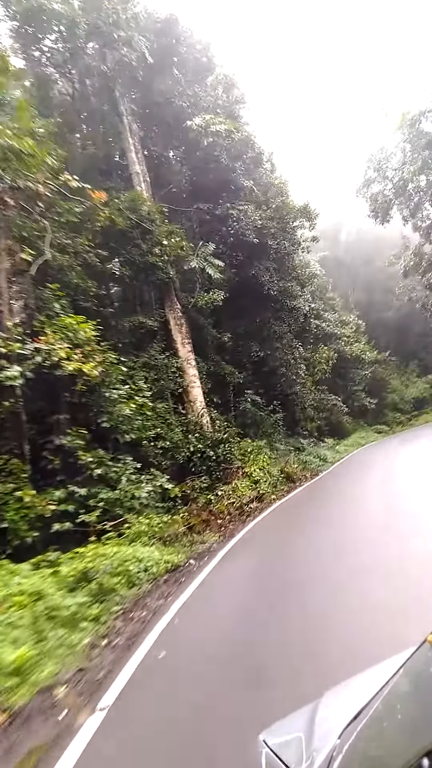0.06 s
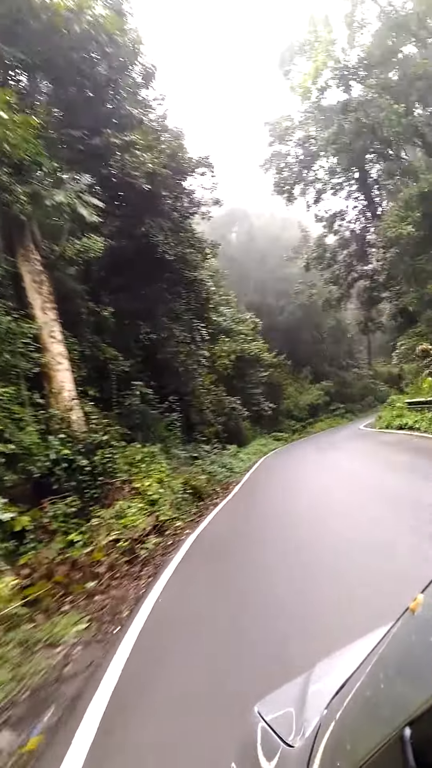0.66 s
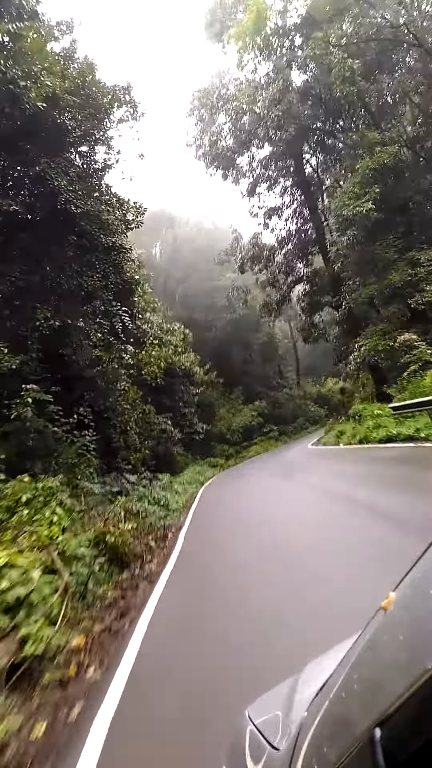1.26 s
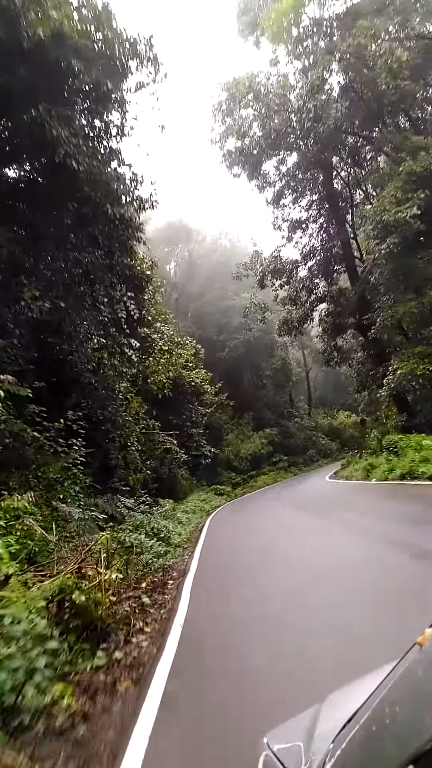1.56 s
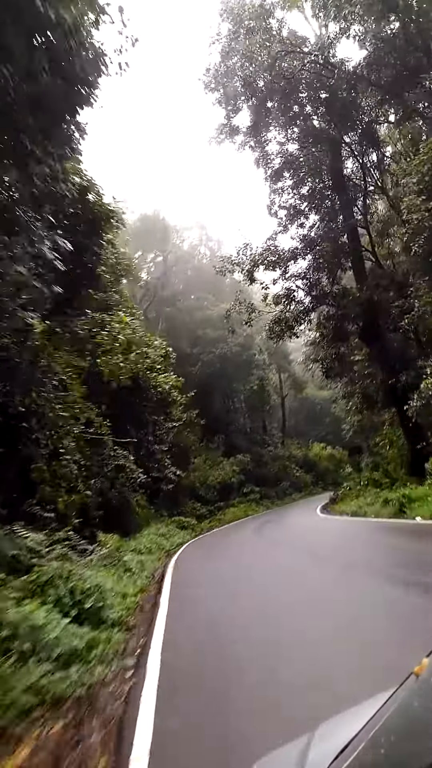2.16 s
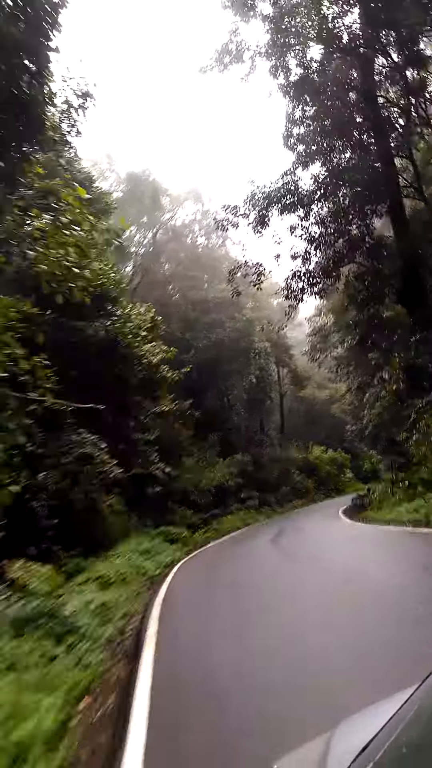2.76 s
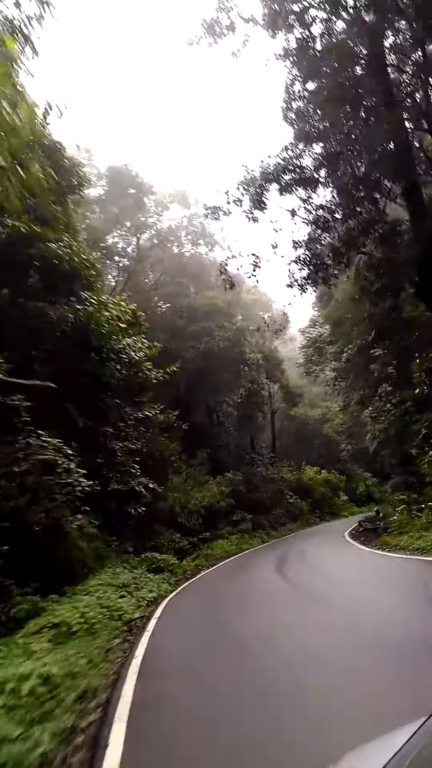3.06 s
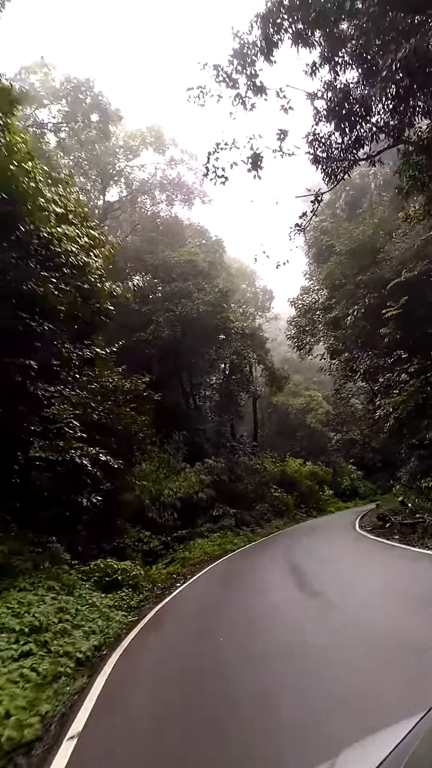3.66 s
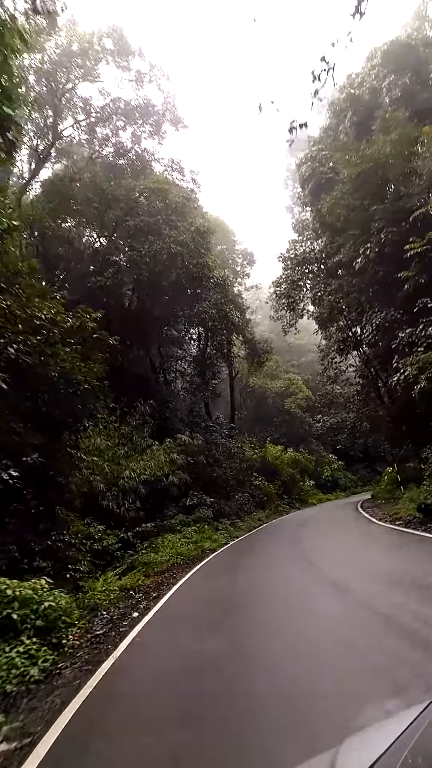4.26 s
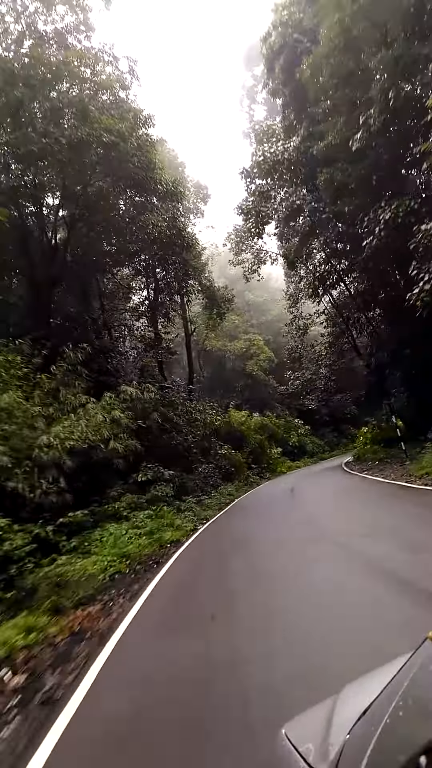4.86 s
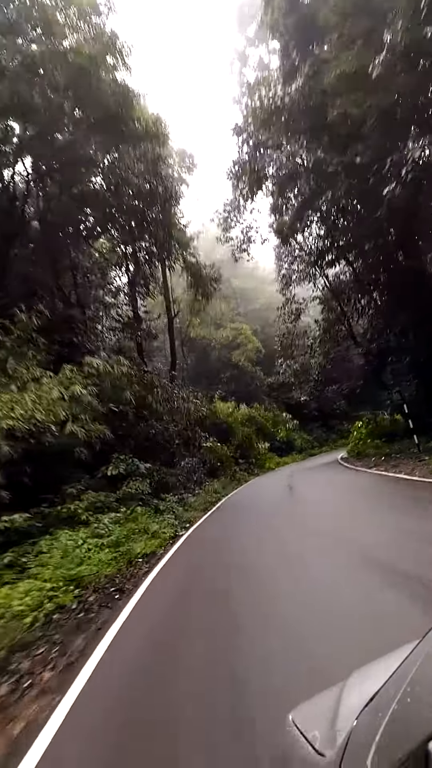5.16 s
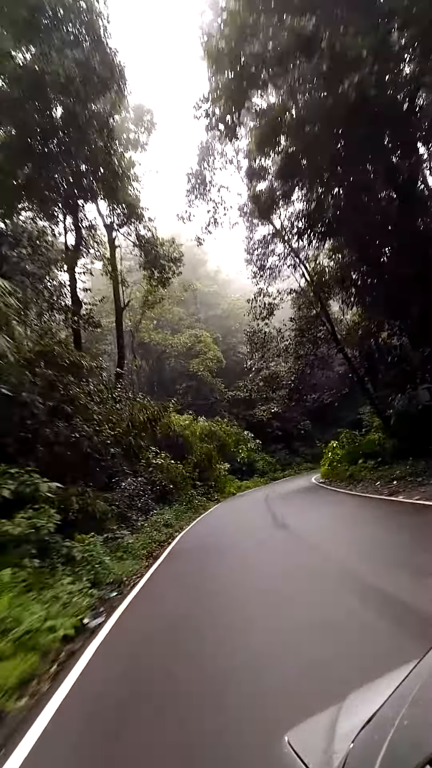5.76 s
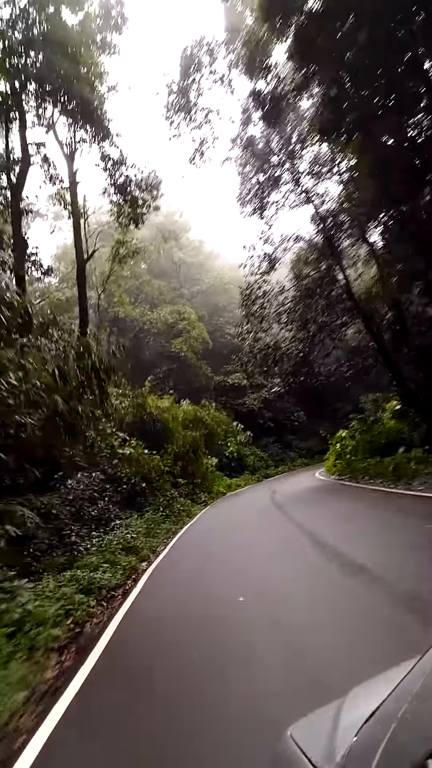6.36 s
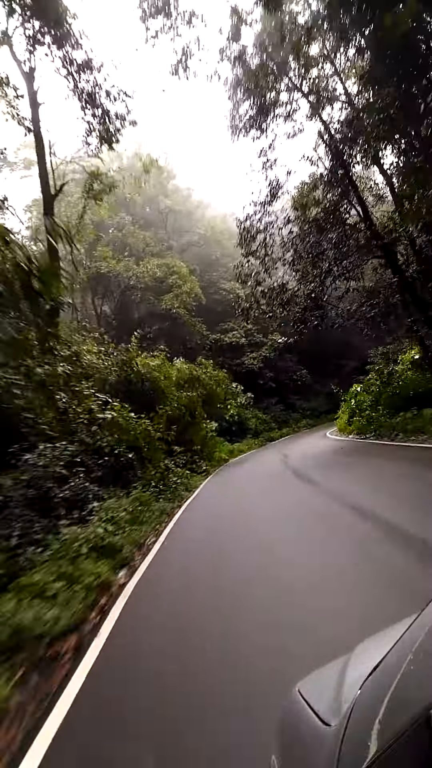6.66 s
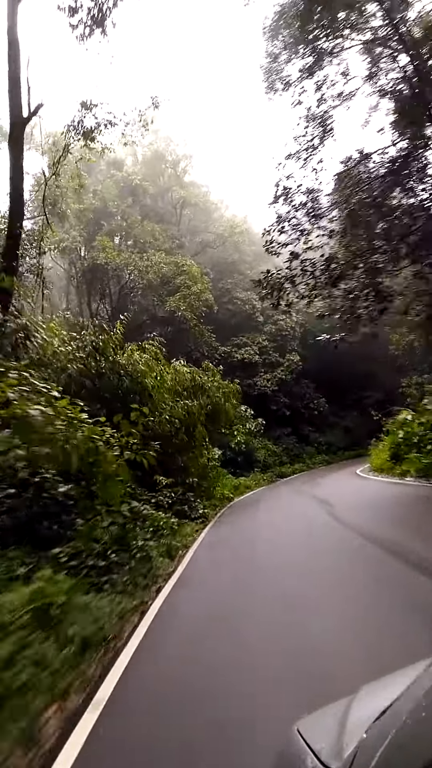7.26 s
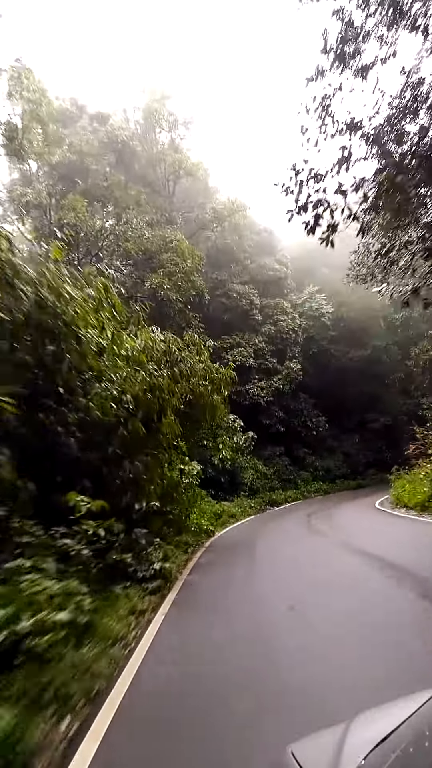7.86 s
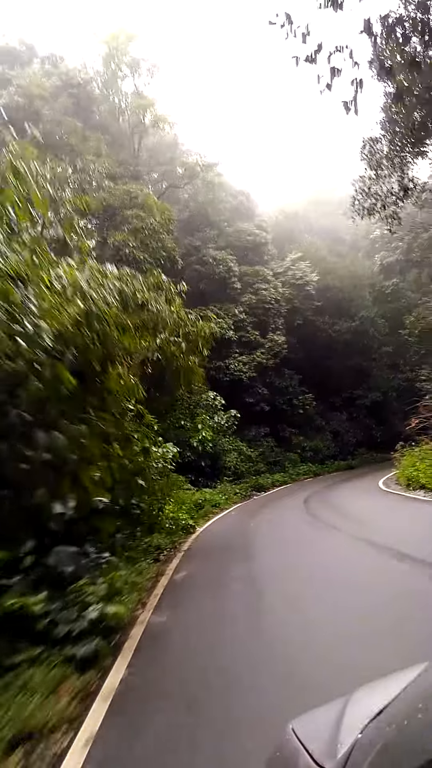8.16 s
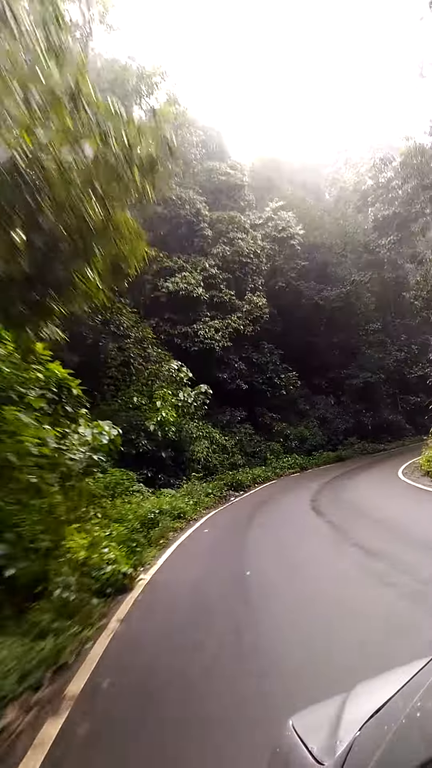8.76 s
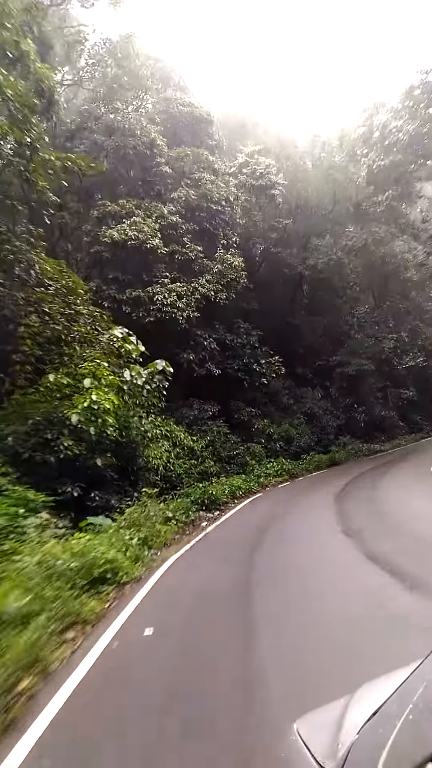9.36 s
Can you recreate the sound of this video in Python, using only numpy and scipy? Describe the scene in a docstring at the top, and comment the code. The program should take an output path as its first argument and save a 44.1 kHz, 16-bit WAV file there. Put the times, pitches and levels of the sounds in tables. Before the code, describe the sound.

Gusting wind buffets and slaps a microphone at an open car window, over a low engine hum and tyres on a damp road.

```python
"""At the open window of a car on a damp forest road, a phone is held in the rushing air.
Swirls of air (eddies) buffet its microphone, tear into a rough flutter on their crests and
now and then land as hard slaps; the biggest swings overload the input. Underneath, the engine
hums higher as the car gathers speed, then eases off. The tyres roar and hiss on the road,
and thin high tones swell briefly."""
import sys
import numpy as np
from scipy import signal
from scipy.fft import rfft, irfft, next_fast_len
from scipy.io import wavfile
from scipy.ndimage import uniform_filter1d, map_coordinates

SR = 44100
rng = np.random.default_rng(int(sys.argv[2]) if len(sys.argv) > 2 else 0)


def output_pcm(signal):
    """Save a mono or channel-first signal as 16-bit PCM at the path in sys.argv[1].

    Samples are clipped to [-1, 1] before scaling.
    """
    pcm = np.clip(np.atleast_2d(signal).T, -1, 1) * 32767
    wavfile.write(sys.argv[1], SR, np.round(pcm).astype(np.int16))


N = 414540
TIME = np.arange(N) / SR


def from_db(db):
    """Turn decibels into a number to multiply by."""
    return 10 ** (np.asarray(db) / 20)


def in_time(rows):
    """Join a table's points with straight lines: one curve for each column after the time."""
    times, *columns = np.transpose(rows)
    return [np.interp(TIME, times, column) for column in columns]


def noise(colour):
    """Noise of average size (rms) 1; its colour says how strong each frequency is."""
    size = next_fast_len(N)
    hz, db = np.transpose(colour)
    pitch = np.log(np.maximum(np.arange(size // 2 + 1) * SR / size, 1))
    outside = np.abs(pitch - np.clip(pitch, np.log(hz[0]), np.log(hz[-1])))
    gain = from_db(np.interp(pitch, np.log(hz), db) - 40 * outside)  # fades fast past both ends
    shaped = irfft(rfft(rng.standard_normal(size)) * gain, size)[:N]
    return shaped / np.sqrt(np.mean(shaped ** 2) + 1e-20)


def drift(rate_hz):
    """A smooth random wobble of size 1 that changes about rate_hz times a second."""
    return noise([(1, 0), (rate_hz, 0)])


def evened(x, span_s):
    """Hold a sound's average size near 1, ironing out swells slower than span_s."""
    size = max(int(span_s * SR), 2)
    return x / np.sqrt(uniform_filter1d(uniform_filter1d(x ** 2, size), size) + 1e-9)


def sped_up(x, speed):
    """Play a noise faster or slower, so that it sounds higher or lower."""
    return map_coordinates(x, [np.cumsum(speed)], order=3, mode="mirror")


def flickering(x, depth_db, rate_hz, bands):
    """Split a hiss into bands and let each one waver on its own."""
    size = next_fast_len(N)
    spectrum = rfft(x, size)
    hz = np.linspace(0, SR / 2, len(spectrum))
    centres_hz = np.linspace(2000, 12000, bands)
    parts = (irfft(spectrum * np.interp(hz, centres_hz, band), size)[:N] for band in np.eye(bands))
    return sum(part * from_db(depth_db * drift(rate_hz)) for part in parts)


# how fast the engine fires and how loud it hums: t/s, f/Hz, level/dB
ENGINE_RUN = [(0, 121, -37.5), (1.2, 128, -30), (2.3, 135.1, -30.5), (3, 139.9, -25.5), (3.7, 144.1, -26),
              (4.4, 148, -26), (5.3, 154.9, -27), (6.2, 162.7, -23), (6.7, 161.8, -40), (7.4, 153.1, -31),
              (8.3, 148.1, -27.5), (9.4, 141.3, -32)]
# the tones in the hum: multiple of the firing rate, relative level/dB
ENGINE_TONES = [(.5, -7), (1, -2.5), (1.5, -19), (2, -26)]

def engine(wander=0.0022, rough_db=1.67):
    """The engine's firing makes a few low tones that rise and fall with the car's speed."""
    firing_hz, hum_db = in_time(ENGINE_RUN)
    phase = 2 * np.pi * np.cumsum(firing_hz * (1 + wander * drift(5.4))) / SR
    tones = sum(from_db(db + rough_db * drift(12)) * np.sin(k * phase) for k, db in ENGINE_TONES)
    return from_db(hum_db) * np.sqrt(2) * tones


# tyre noise along the road: t/s, roar level/dB, hiss level/dB (both trimmed in tyres)
ROAD_LEVELS = [(0.0, -44.5, -54.5), (2.1, -41.5, -52), (3.3, -41, -53), (4.2, -39.7, -51.5),
               (5.0, -42, -50.5), (5.7, -37, -52), (6.5, -37, -52.5), (7.0, -40.5, -49.5),
               (7.7, -43, -50.5), (8.1, -37, -49), (9.4, -46, -50)]
# how the noise of the tread comes and goes: t/s, relative level/dB
TREAD_LEVELS = [(0, -6), (2, -5.5), (3.5, -0.5), (5.3, -2), (6.5, -10), (9.4, -10)]
# colours of the roar, the tread and the hiss: f/Hz, level/dB
ROAR_COLOUR = [(90, -4.5), (200, 9.5), (350, 2.5), (600, -4.5), (850, -4), (1400, -8), (1800, -7),
               (2200, -18), (2750, -17.5), (3200, -21.5), (4000, -22.5), (7000, -52)]
TREAD_COLOUR = [(700, -19.5), (870, -3.5), (1060, -3), (1200, -12.5), (1400, -24)]
HISS_COLOUR = [(1800, -12), (2800, -1), (3800, -3.5), (5000, 2), (5700, 2), (6250, 3.5), (7000, -2),
               (7900, -8), (8850, -7), (10000, -15.5), (12000, -20.5), (14200, -26.5)]

def tyres(swell_db=0.76):
    """Rolling tyres roar, their tread sounds higher with speed, and the damp road hisses."""
    roar_db, hiss_db = in_time(ROAD_LEVELS)
    firing_hz, _ = in_time(ENGINE_RUN)
    tread = sped_up(noise(TREAD_COLOUR), firing_hz / firing_hz.mean())
    roar = noise(ROAR_COLOUR) + from_db(in_time(TREAD_LEVELS)[0] - 5) * tread
    hiss = flickering(noise(HISS_COLOUR), depth_db=1.84, rate_hz=19, bands=14)
    return from_db(roar_db + 1) * roar + from_db(hiss_db - 0.5 + swell_db * drift(6)) * hiss


# brief high tones: t/s, length/s, f/Hz, width/Hz, level/dB
THIN_TONES = [(1.38, 0.11, 6200, 300, -62), (3.383, .12, 6100, 300, -57), (4.583, 0.11, 6150, 250, -52.5),
              (5.03, 0.2, 6200, 350, -50.5), (5.05, .2, 8600, 900, -66), (9.33, 0.26, 2750, 14, -47.5)]

def thin_tones():
    """Narrow bands of noise swell and fade, heard as thin high tones."""
    out = np.zeros(N)
    for at_s, length_s, hz, width_hz, db in THIN_TONES:
        decay = np.exp(-np.pi * width_hz / SR)
        feedback = [1, -2 * decay * np.cos(2 * np.pi * hz / SR), decay * decay]  # rings at hz
        band = signal.lfilter([1, 0, -1], feedback, rng.standard_normal(N))
        swell = np.exp(-(2 * (TIME - at_s) / length_s) ** 2)
        out += from_db(db) * evened(band, span_s=0.02) * swell
    return out


# strength of the air rushing past the window: t/s, level/dB
AIRFLOW = [(0.0, 0.5), (0.25, -6), (1.4, 0), (2.05, -5), (3.15, -4.5), (5.0, 1.0), (6.0, 0.6), (7.0, 3),
           (8.1, 9), (8.58, 11.5), (9.08, 7), (9.4, 3)]
# gusts: t/s, length/s, large eddy lift/dB, small eddy lift/dB, flutter lift/dB
GUSTS = [(0.478, 0.13, 2, 1.5, 6.5), (0.817, 0.11, 3, 6, 7), (1.138, 0.034, 4.5, 5.5, 2),
         (1.316, 0.14, 5, 5, 5.5), (1.475, 0.081, -2.5, 2, -3), (1.64, 0.098, 1, 5.5, 3.5),
         (2.2, 0.22, 0, 4, -0.5), (2.77, 0.043, 0.5, 10, 5.5), (2.9, 0.089, 7.5, 9, 7),
         (3.335, 0.29, 1.5, -1, 2.5), (3.837, 0.17, 10, 4.5, 4), (4.547, 0.19, 4, 2, 4),
         (4.75, 0.072, 5, 2, 3.5), (5.224, 0.1, 3, 1.5, 1), (5.415, 0.07, 8.5, 7, 1),
         (6.188, 0.19, 3.5, 3.5, 7.5), (6.46, 0.17, 9.5, 3, 8), (6.533, 0.056, -1, 4.5, 2),
         (6.633, 0.13, 3.5, 8, 4.5), (6.85, 0.079, -0.5, 0.5, -1), (7.207, 0.16, 10, 6.5, 5.5),
         (7.403, 0.071, 7, 3, 4.5), (7.643, 0.18, 7.5, 5.5, 7), (7.803, 0.07, -1.5, 4, -5),
         (7.907, 0.12, 4, 0.5, 1), (8.18, 0.09, -0.5, 4.5, 0), (8.423, 0.11, 7.5, -0.5, 0),
         (8.691, 0.041, 9, -4, 2), (8.824, 0.15, 4, 2, 2.5), (9.01, 0.06, -1, 5, 0.5),
         (9.18, 0.062, 1, 5.5, 0), (9.347, 0.097, -3, -1, 3)]
# short lulls in the wind: t/s, dip/dB (a negative dip is a lift)
LULLS = [(0.07, 3), (0.25, 7), (0.65, 3), (0.94, 4.5), (3.2, 5.5), (3.53, 4.5), (5.68, 5), (6.03, 6),
         (6.94, 8), (7.11, 4), (9.1, -2)]

def wind_levels(rise_share=0.41, lull_s=0.049, puff_db=1.68):
    """Airflow, gusts, lulls and random puffs set how loud the wind's three parts are, in dB."""
    flow_db, = in_time(AIRFLOW)
    levels = np.array([-11.5 + 0.28 * flow_db,  # large eddies
                       -23 + 0.82 * flow_db,  # small eddies
                       -36.7 + 0.9 * flow_db])  # flutter
    for at_s, length_s, *lift_db in GUSTS:
        near = np.abs(TIME - at_s) < 2 * length_s
        age = (TIME[near] - at_s) / length_s
        width = np.where(age < 0, rise_share, 1 - rise_share)  # builds faster than it fades
        levels[:, near] += np.outer(lift_db, np.exp(-(age / width) ** 2))
    for at_s, dip_db in LULLS:
        near = np.abs(TIME - at_s) < 2 * lull_s
        levels[:, near] -= dip_db * np.exp(-(2 * (TIME[near] - at_s) / lull_s) ** 2)
    return levels + puff_db * drift(16.7)


# colours of the soft flutter and of the sharp rasp of tearing air: f/Hz, level/dB
FLUTTER_COLOUR = [(120, -13), (250, 5.5), (400, -2), (700, -6.5), (1200, -12), (2000, -24), (3200, -34.5),
                  (5000, -50), (9000, -62), (14000, -68)]
RASP_COLOUR = [(900, -18), (2000, 5.5), (3000, -6), (5000, -13), (8000, -24), (14000, -49)]

def flutter(swing, flutter_db, crest_db=13.0, ragged_db=7.0, lag_s=0.0018):
    """The air tears into ragged bursts just after each pressure crest, and less after each dip."""
    crest = np.tanh(np.interp(TIME - lag_s, TIME, swing))
    bursts = from_db(crest_db * np.maximum(crest, -0.5 * crest) + ragged_db * np.tanh(drift(66.5)))
    level = from_db(flutter_db)
    soft = level * evened(bursts * noise(FLUTTER_COLOUR), span_s=0.056)
    # squared, so that only strong wind rasps
    rasp = from_db(-0.5) * (level * evened(bursts, span_s=0.053)) ** 2 * noise(RASP_COLOUR)
    return soft + rasp


# hard slaps of air: t/s, relative level/dB, rasp compared with that level/dB
SLAPS = [(0.331, -18, -32), (0.468, -14, -29), (0.509, -11, -27), (0.77, -20, -30), (1.13, -20, -26),
         (1.265, -20, -29), (1.523, -20.5, -23), (1.672, -17, -25), (2.835, -21, -26), (2.881, -16.5, -34),
         (4.526, -11.5, -37), (5.231, -13.5, -20), (6.188, -14.5, -20.5), (6.215, -13, -27),
         (6.625, -10.5, -21), (6.668, -15, -23), (7.22, -10.5, -17.5), (7.293, -9.5, -22),
         (7.394, -13.5, -38), (7.428, -11, -22), (7.661, -11, -28), (7.752, -14.5, -21), (7.81, -18, -22),
         (7.89, -8.5, -26), (8.147, -12.5, -19), (8.23, -10, -35), (8.374, -9, -21), (8.397, -12, -28),
         (8.455, -17, -17), (8.498, -6, -25.5), (8.538, -9, -36), (8.599, -5, -14), (8.655, -15.5, -19),
         (8.756, -16.5, -23), (8.836, -14.5, -18.5), (8.864, -9.5, -19), (8.91, -10.5, -21.5),
         (8.969, -11.5, -33), (9.1, -15, -19), (9.325, -8.5, -25)]
# colour of a slap's dull body: f/Hz, level/dB
SLAP_COLOUR = [(80, -22.5), (200, 12.5), (500, 4), (1000, -4), (1700, -13), (2500, -29.5), (5000, -41.5)]

def slaps(pressure, rise_s=0.00096, fall_s=0.0024, push_s=0.0073, drop_s=0.0015, sweep=0.46):
    """A strong eddy sweeps others aside, piles up pressure and collapses with a thump and a rip."""
    body, rasp, thump, swept = np.zeros((4, N))
    for at_s, level_db, rasp_db in SLAPS:
        near = np.abs(TIME - at_s) < 0.06
        age = TIME[near] - at_s - 0.002
        burst = from_db(level_db) * np.exp(-np.maximum(-age / rise_s, age / fall_s))
        passing = np.exp(-np.abs(age) / push_s)
        body[near] += burst
        rasp[near] += burst * from_db(rasp_db)
        thump[near] -= from_db(level_db) * np.tanh(age / drop_s) * passing  # a push, then a pull
        swept[near] += np.exp(-0.5 * (age / push_s) ** 2)
    rips = from_db(-2) * body * evened(noise(SLAP_COLOUR), span_s=0.0016)
    rips += from_db(2) * rasp * noise(RASP_COLOUR)
    return pressure * (1 - np.clip(sweep * swept, 0, 1)) + from_db(8) * thump + rips


# colours of the rumble of large and of small eddies: f/Hz, level/dB
LARGE_EDDY_COLOUR = [(4, -10), (12, -6), (22, -1.5), (33, 0.5), (42, -5), (55, -8), (75, -19), (110, -31.5),
                     (200, -60)]
SMALL_EDDY_COLOUR = [(40, -6), (70, 4), (110, 1), (160, -5.5), (220, -13), (300, -28.5), (500, -34.5),
                     (900, -67.5)]

def buffeting(large_db, small_db, lumps_db=2.0, octaves_per_db=0.0058, lean_s=0.0012, ceiling=1.204):
    """Eddies press on the microphone in lumps. Gives the pressure and their evened-out swing."""
    large_gain = from_db(large_db + lumps_db * drift(8.7))
    large = large_gain * evened(noise(LARGE_EDDY_COLOUR), span_s=0.066)
    # small eddies ride on the large ones
    riding = from_db(3.05 * np.abs(evened(large, span_s=0.06)))
    # faster air sheds smaller, quicker eddies
    speed = 2 ** (octaves_per_db * (in_time(AIRFLOW)[0] - 4))
    ripples = sped_up(noise(SMALL_EDDY_COLOUR), speed)
    small = from_db(small_db + lumps_db * drift(15.3)) * evened(riding * ripples, span_s=0.068)
    eddies = large + small
    # each crest builds slowly and drops steeply
    pressure = np.interp(TIME - lean_s * np.tanh(eddies), TIME, eddies)
    return ceiling * np.tanh(pressure / ceiling), evened(eddies, span_s=0.16)


def scene():
    """Wind on the microphone over the sound of the car, in one channel."""
    large_db, small_db, flutter_db = wind_levels()
    pressure, swing = buffeting(large_db, small_db)
    wind = slaps(pressure) + flutter(swing, flutter_db)
    car = engine() + tyres()
    return (wind + car + thin_tones())[None]


def record(dry, clean_limit=0.95, cutoff_hz=14250):
    """The phone's input squashes the biggest swings and cuts off the highest treble."""
    clean = np.clip(dry, -clean_limit, clean_limit)
    headroom = 1 - clean_limit
    squashed = clean + headroom * np.tanh((dry - clean) / headroom)
    treble_cut = signal.ellip(10, 0.1, 80, cutoff_hz, fs=SR, output="sos")
    return signal.sosfilt(treble_cut, squashed)


dry = scene()
out = record(dry)
output_pcm(out)
```